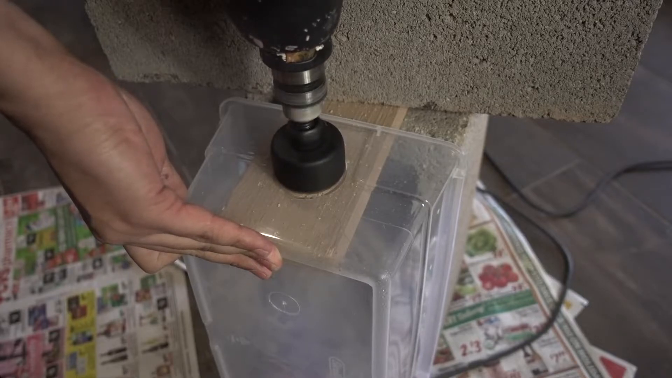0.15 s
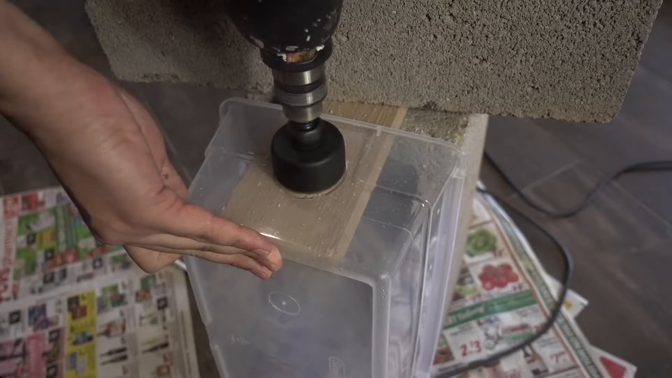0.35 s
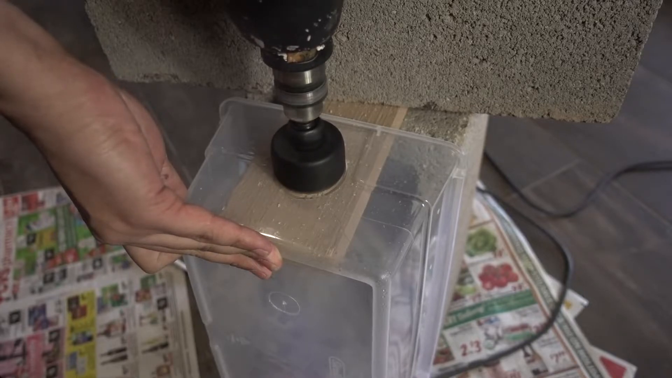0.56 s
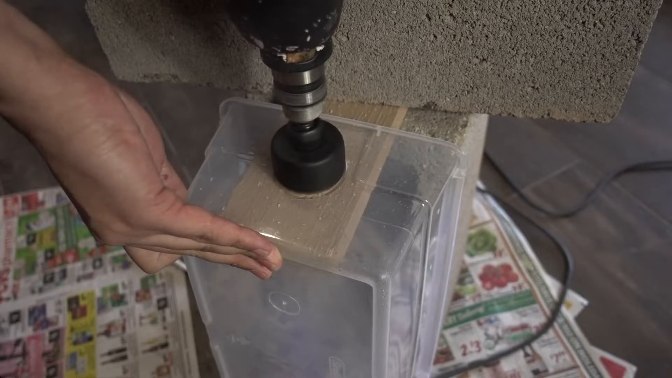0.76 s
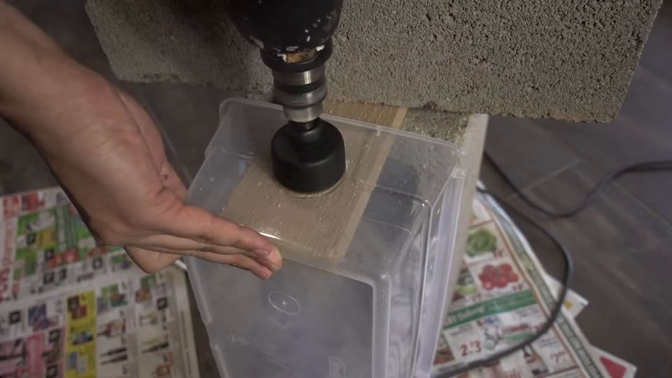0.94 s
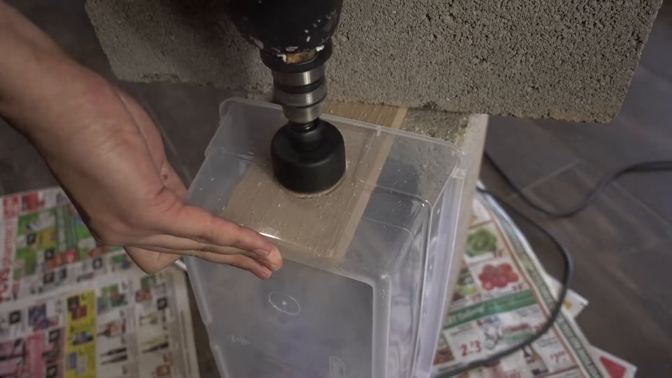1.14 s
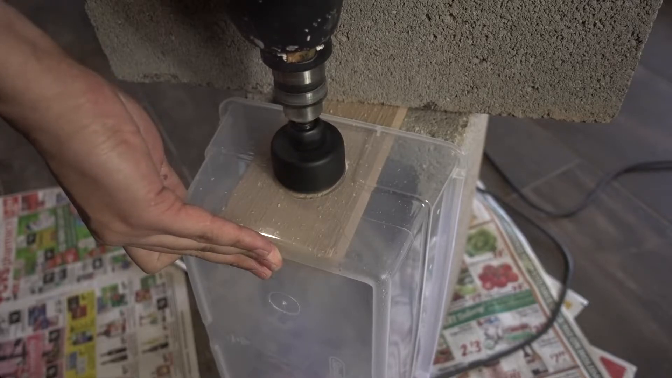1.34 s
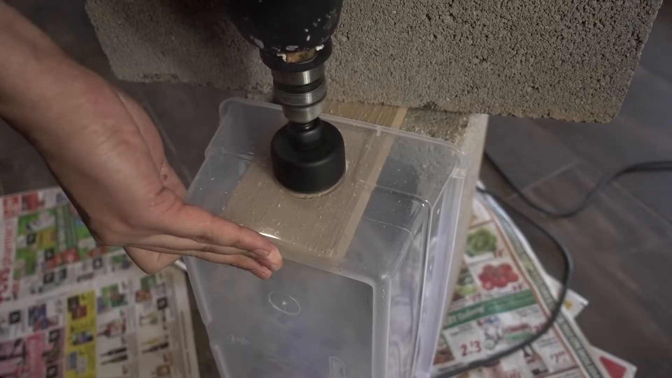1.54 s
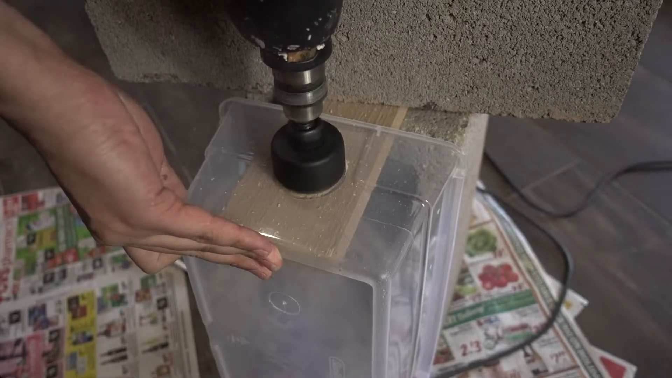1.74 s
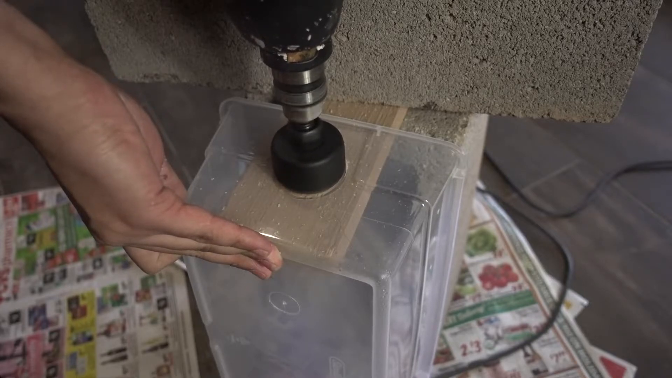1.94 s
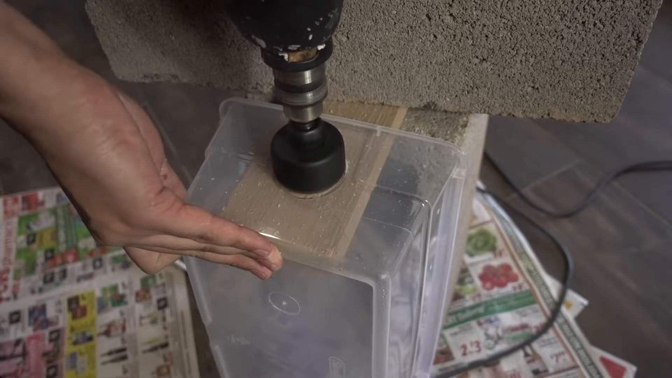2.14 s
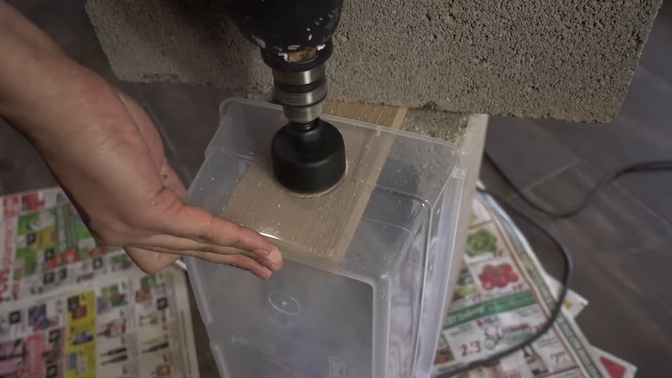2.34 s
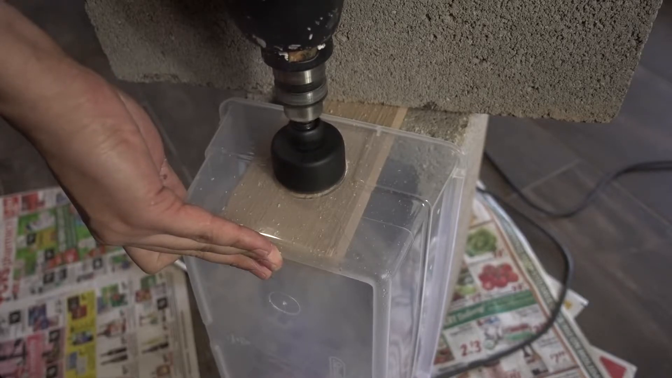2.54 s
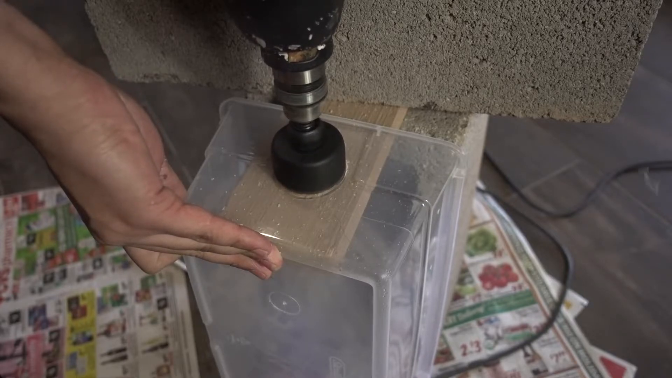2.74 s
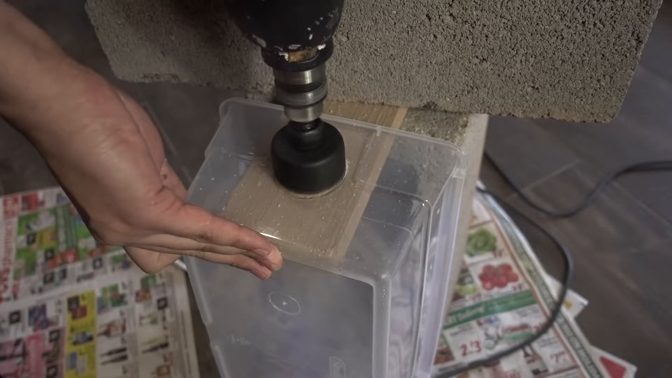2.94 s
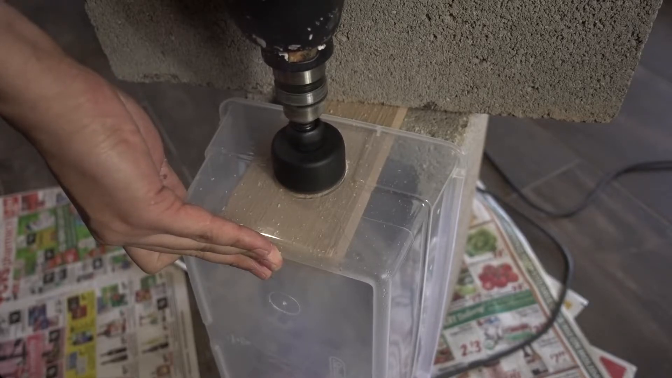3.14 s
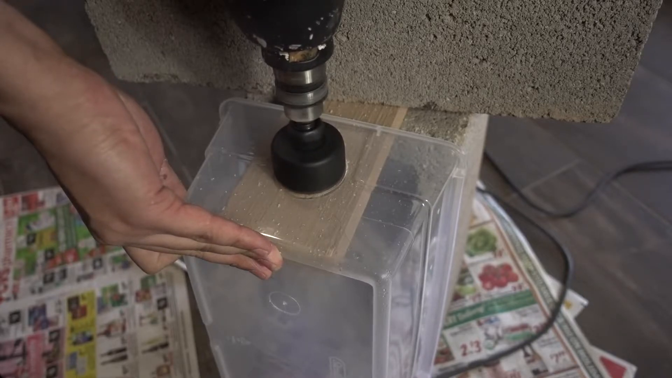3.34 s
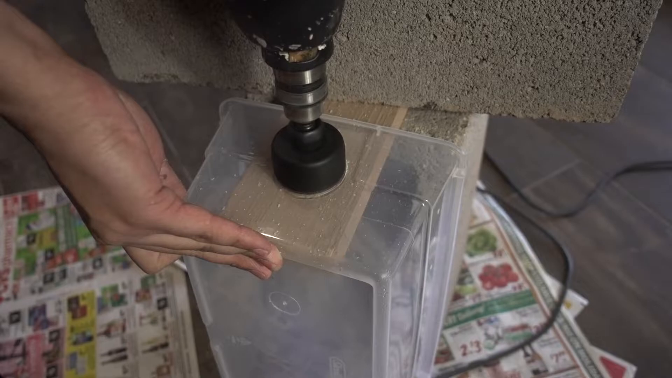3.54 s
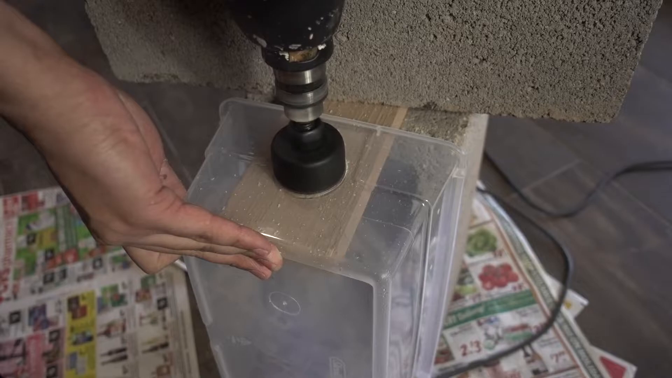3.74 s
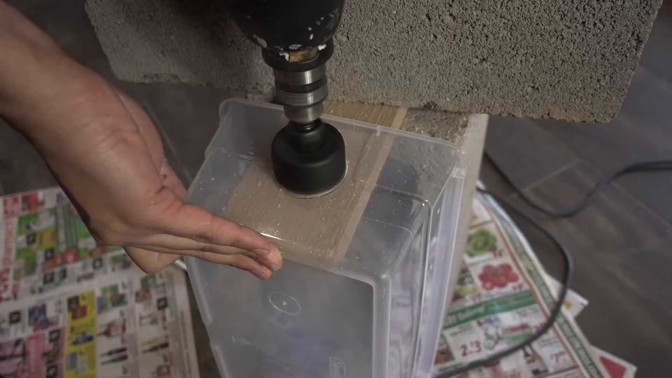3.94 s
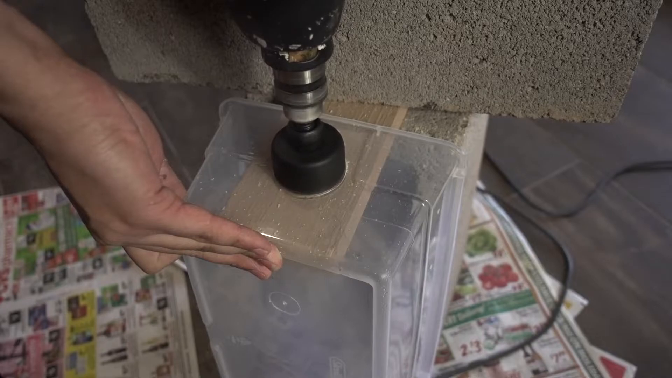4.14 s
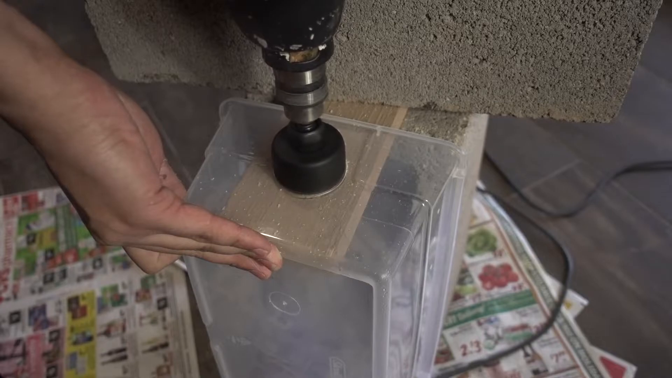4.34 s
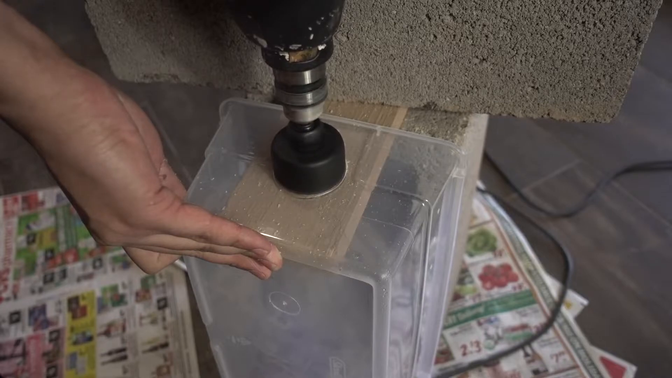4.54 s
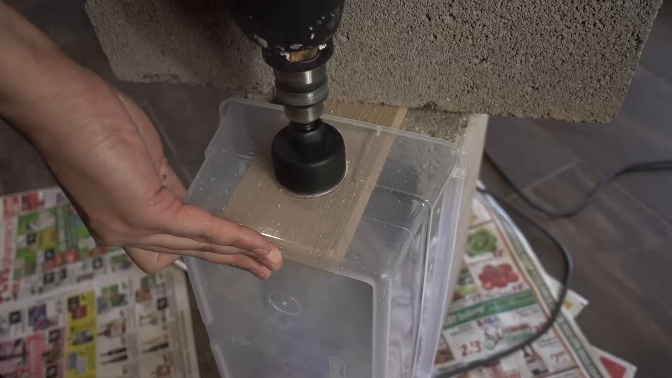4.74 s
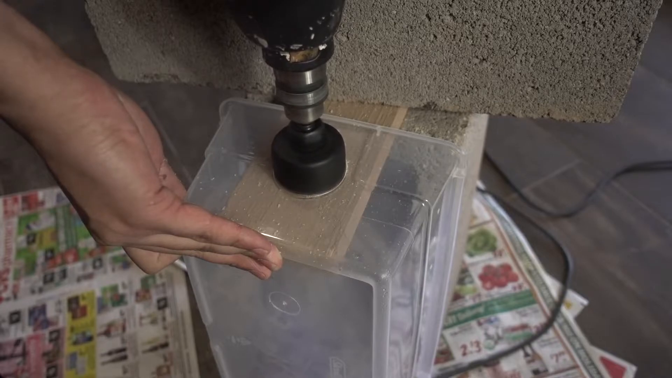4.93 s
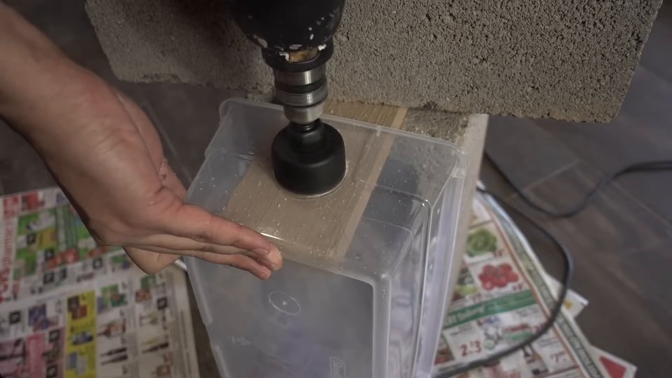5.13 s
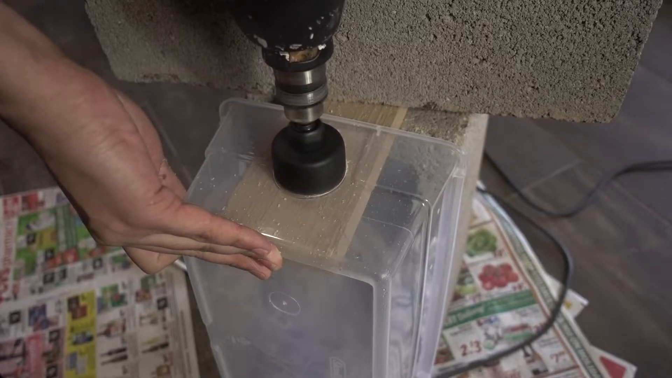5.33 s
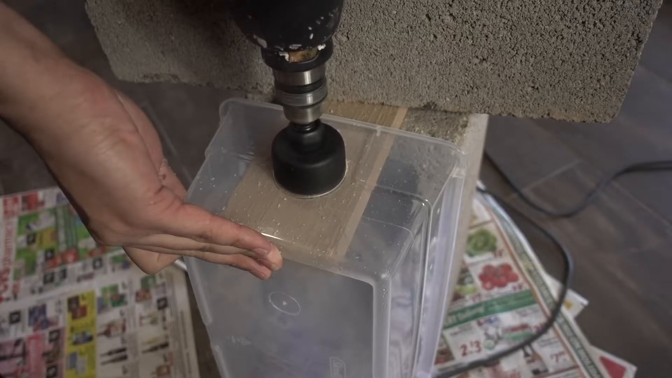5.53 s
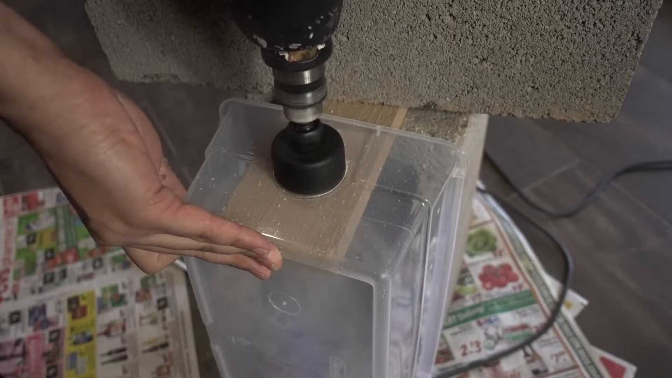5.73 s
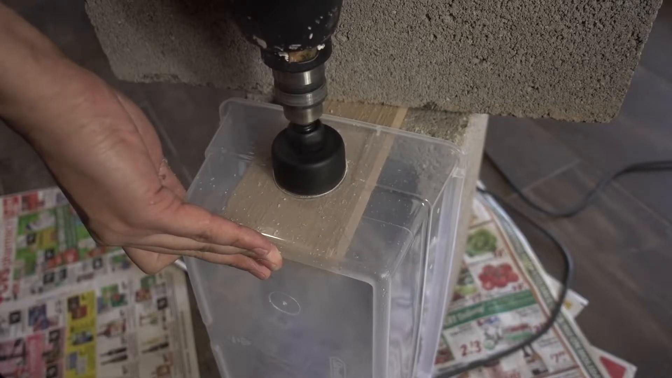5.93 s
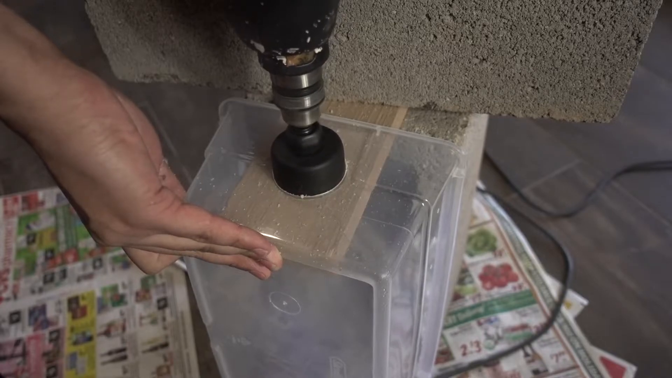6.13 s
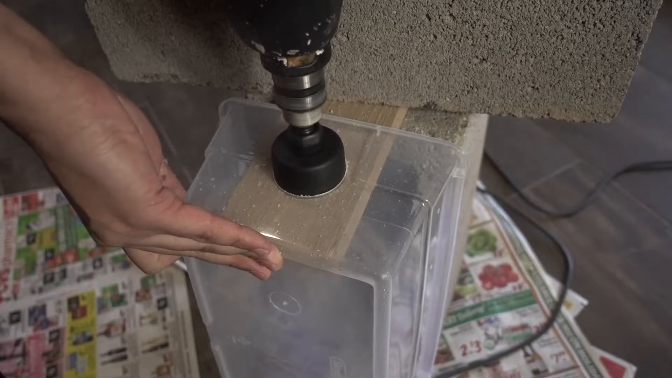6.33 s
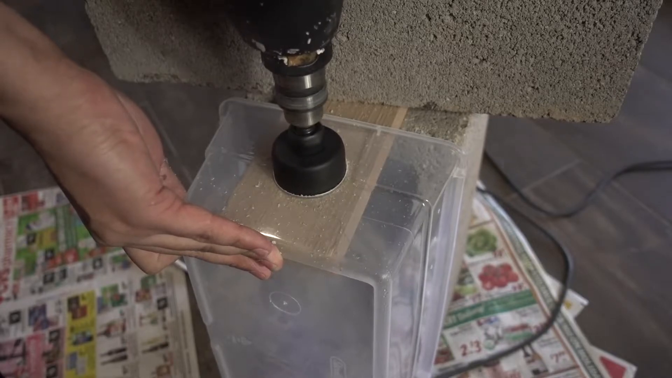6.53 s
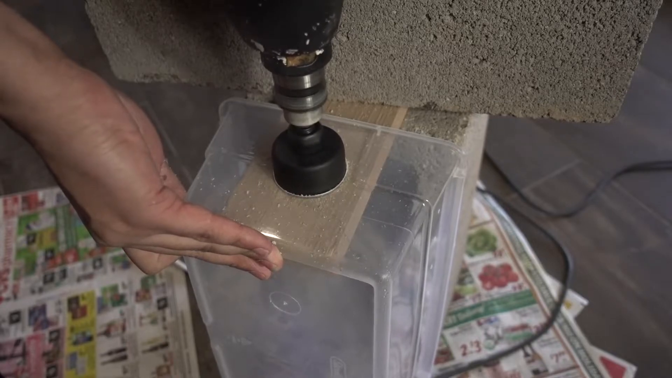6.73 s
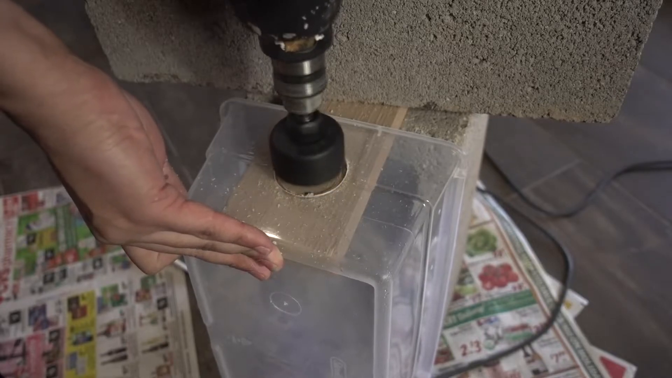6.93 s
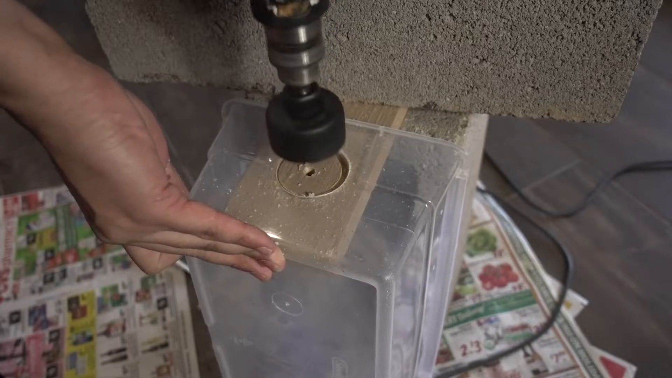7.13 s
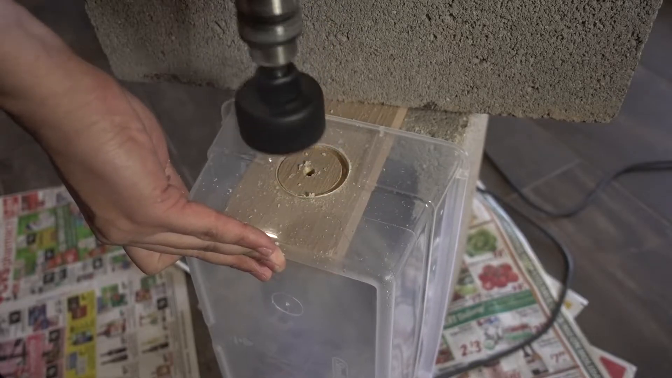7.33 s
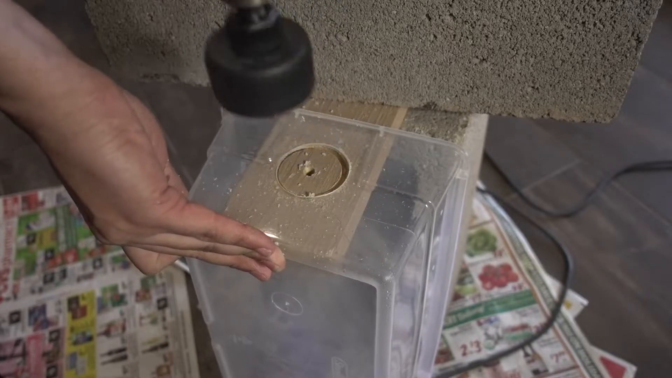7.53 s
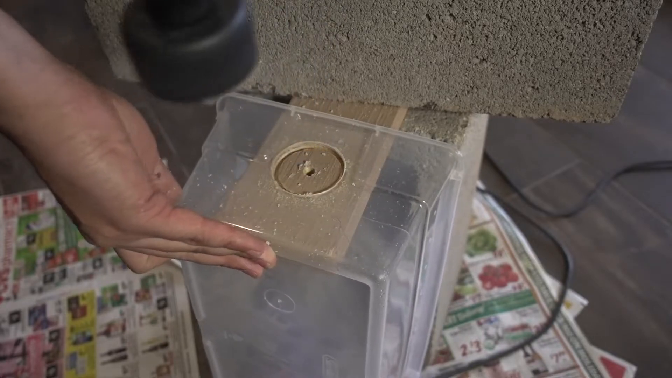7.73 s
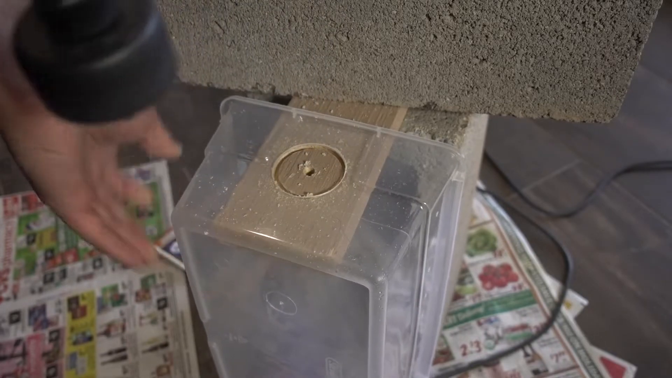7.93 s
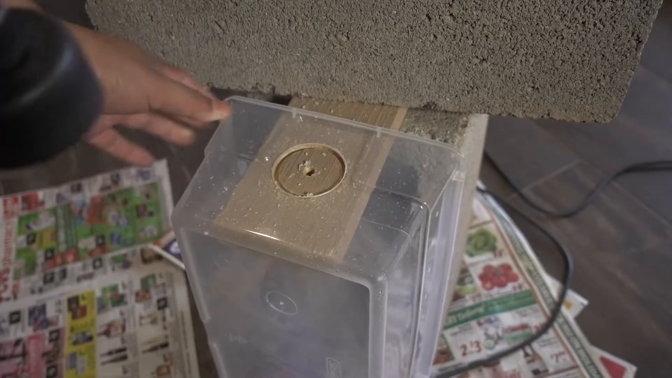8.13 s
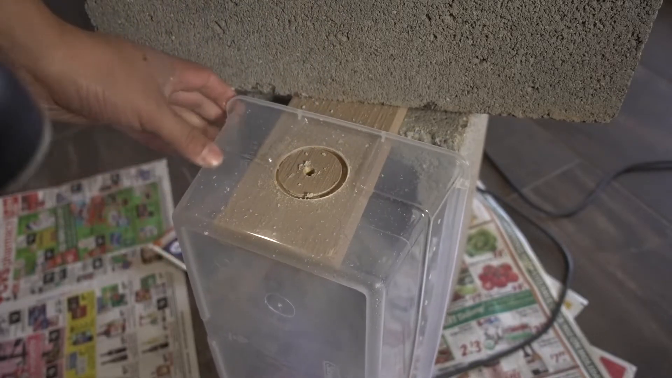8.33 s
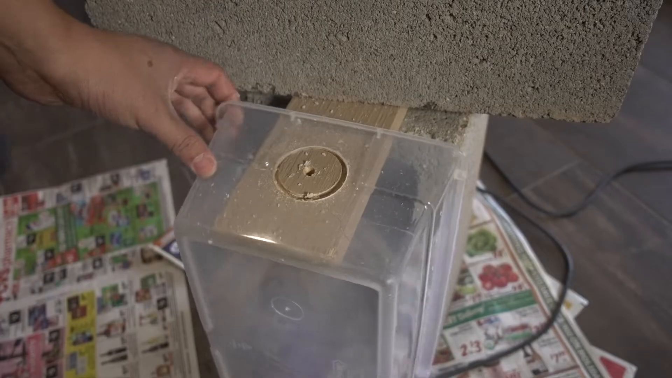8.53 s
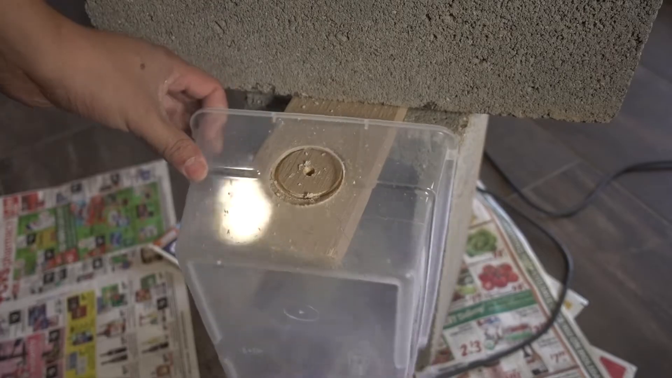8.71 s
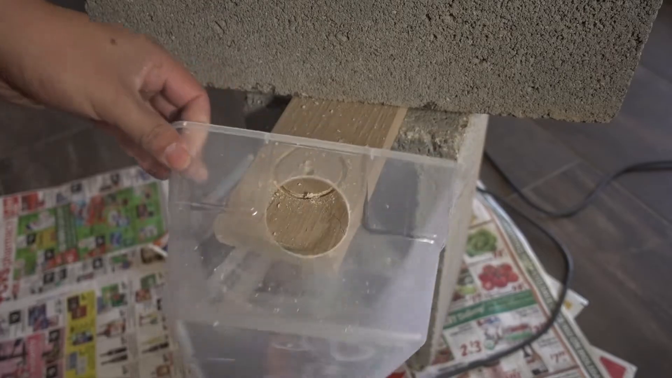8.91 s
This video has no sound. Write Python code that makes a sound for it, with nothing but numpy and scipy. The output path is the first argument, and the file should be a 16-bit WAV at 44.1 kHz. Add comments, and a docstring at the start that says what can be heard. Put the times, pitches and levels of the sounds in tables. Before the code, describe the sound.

A corded drill grinds a hole saw through a plastic box with a harsh whine, then winds down with rattling gears.

```python
"""A harsh, grinding whine: a corded drill turns a hole saw through a plastic box in a small room.
One shaft drives the hum, gear mesh, commutator buzz and brush hiss, so their pitch sags under load
and rises as the saw breaks through. The drill is lifted out to the left and its cooling air sweeps
over the microphone. With the power off it coasts down in falling whistles and rattling gears,
and a hand bumps the box."""
import sys
import numpy as np
from scipy import signal
from scipy.fft import rfft, irfft, next_fast_len
from scipy.io import wavfile
from scipy.ndimage import map_coordinates

SR = 44100
rng = np.random.default_rng(int(sys.argv[2]) if len(sys.argv) > 2 else 0)


def persist_wave(psi):
    """Save psi, clipped to +-1, as 16-bit WAV."""
    counts = np.round(np.clip(psi, -1, 1) * 32767).astype(np.int16)
    wavfile.write(sys.argv[1], SR, np.atleast_2d(counts).T)


N = 399974
TIME = np.arange(N) / SR

PIERCE_S, THROUGH_S, CLEAR_S = 4.5, 6.1, 6.95  # first teeth pierce, the disc gives way, the saw is clear
RELEASE_S, SWING_START_S, SWING_END_S = 7.3, 7.58, 8.05  # trigger let go; the drill swings left
FREE_SPEED, LOADED_SPEED = 402, 352  # shaft with no load and full load [turns/s]
MAINS_HZ, TOP_HZ = 60, 15850

# Motor shaft under power: (time [s], speed [turns/s])
SHAFT_SPEED = [(0, 382), (.6, 374), (1.2, 366.5), (1.7, 363.5), (2.3, 357.5), (2.7, 358.5), (3.1, 362),
               (4, 357), (5, 350), (5.4, 354), (5.8, 348), (6.1, 340), (6.19, 328), (6.3, 338), (6.5, 354),
               (6.9, 390), (7.12, 400), (7.3, 378)]
def motor():
    """Torque balance: speed sags with load (0-1); unpowered, friction and quadratic fan drag brake it."""
    friction, drag_speed = 94.3, 248  # deceleration [turns/s^2]; speed where drag equals it [turns/s]
    driven, = curves(SHAFT_SPEED)
    coast_s = np.maximum(TIME - RELEASE_S, 0)
    coasting = drag_speed * np.tan(np.arctan(driven[-1] / drag_speed) - coast_s * friction / drag_speed)
    sag = np.clip((FREE_SPEED - driven) / (FREE_SPEED - LOADED_SPEED), 0, 1)
    load = sag ** 0.91 * (1 - ramp(THROUGH_S, CLEAR_S))
    return np.where(TIME < RELEASE_S, driven, coasting), load


# Noise spectra of gear rattle, gear rasp and brushes: (frequency [Hz], spectral level [dB])
RATTLE_SPECTRUM = [(150, -56), (530, -36), (900, -5), (1100, -3), (1190, -1.5), (1290, -3), (1450, -0.5),
                   (2040, 0), (2240, -2.5), (3100, -4), (4030, -26), (6820, -120)]
RASP_SPECTRUM = [(400, -70), (1650, -38), (2800, -7), (3070, -8.5), (3480, -1), (3820, -4), (4290, 1.5),
                 (4640, -3), (5400, -11.5), (7020, -21), (11900, -120)]
BRUSH_SPECTRUM = [(2940, -35), (5000, -2), (5760, -3.5), (6250, -0.5), (6860, -2.5), (7560, 1), (8290, -5),
                  (9600, -4.5), (12000, -8.5), (12900, -8.5), (13800, -11.5), (15000, -8.5), (16000, -15)]
def gears_and_brushes(turns, speed, load, powered, mains):
    """Amplitude modulation: friction noise pulses with each turn, while tooth impacts ring the case."""
    shaft = np.cos(2 * np.pi * turns)
    bite = wobble(70)  # the teeth catch unevenly
    rattle_db = by_speed(speed, -23, knee=353, halving_db=8.2) - 0.07 * load
    rattle = amp(rattle_db) * spread(white() * amp(2.5 * shaft + 0.58 * bite), RATTLE_SPECTRUM)
    overrun_db = 1 - powered  # more rasp once the saw drives the motor
    rasp_db = by_speed(speed, -21, knee=192, halving_db=17.4) + overrun_db
    rasp = amp(rasp_db) * spread(white() * amp(2 * shaft + 0.64 * bite + 0.31 * mains), RASP_SPECTRUM)
    sparks = white() * amp(.9 * shaft + 0.66 * bite + 0.23 * mains + 0.84 * wobble(300))
    brushes = amp(by_speed(speed, -21.5, knee=348, halving_db=9.2)) * spread(sparks, BRUSH_SPECTRUM)
    teeth = unit(filtered(impacts(6 * turns + .2 * wobble(500), scatter_db=3), gear_case))
    return rattle + rasp + brushes + amp(rattle_db - 4.5) * in_room(teeth, wet_db=-9.5)


# Shaft hum: (multiple of shaft speed, relative level loaded [dB], relative level free [dB])
HUM_PARTIALS = [(1, 2, -3), (2, 4.5, 2.5), (3, 9, 13.5), (4, 12.5, 10)]
# Six-tooth mesh with sidebands, and commutator: (multiple of shaft speed, relative level [dB])
MESH_PARTIALS = [(4, -10), (5, -1.5), (6, 1), (7, -.3), (8, -5.5), (9, -12.5), (10, -23), (11, -14)]
BUZZ_PARTIALS = [(12, 0.5), (18, -6), (22, -11), (24, -9.5), (36, -18)]
def whine(turns, speed, load, mains):
    """Periodic forcing: shaft, gear mesh and commutator radiate harmonics of the rotation rate."""
    free = ramp(THROUGH_S, CLEAR_S)
    idle = (1 - load) * (speed / FREE_SPEED) ** 2
    hum_levels = [(k, loaded_db + free * (free_db - loaded_db)) for k, loaded_db, free_db in HUM_PARTIALS]
    hum_fade = 1 - ramp(RELEASE_S, RELEASE_S + 0.65)
    hum_gain = hum_fade * amp(by_speed(speed, -48.5, knee=380, halving_db=26))
    hum = hum_gain * partials(turns, hum_levels, flutter_db=2.1, flutter_rate=25)

    case_hz, half_width_hz = 1940, 110  # mesh partials swell as they cross this resonance
    mesh_levels = [(k, db + 5.5 / (1 + ((k * speed - case_hz) / half_width_hz) ** 2))
                   for k, db in MESH_PARTIALS]
    mesh_gain = load * (1 - free) ** 2 * amp(-30) + idle * amp(-52)
    mesh = mesh_gain * partials(turns + 0.0058 * wobble(90), mesh_levels, flutter_db=2, flutter_rate=45)

    shudder = 0.0084 * wobble(130) + 0.003 * mains  # torque ripple twists the armature
    saw_turns = turns / 17.3  # gear reduction
    throb = amp(1.2 * mains + 0.71 * np.cos(2 * np.pi * saw_turns))
    breakout_db = 5 * np.sin(np.pi * free)
    buzz_gain = throb * (load * amp(-29.5) + idle * amp(-34.5 + breakout_db))
    buzz = buzz_gain * partials(turns + shudder, BUZZ_PARTIALS, flutter_db=2.5, flutter_rate=70)
    strain_db = 1.5 * load * np.clip((LOADED_SPEED - speed) / 10, 0, 1)  # the motor bogs down
    return in_room(hum + amp(strain_db) * (mesh + buzz), wet_db=-11)


# Churning saw and droning box bottom: (frequency [Hz], spectral level [dB])
CHURN_SPECTRUM = [(15, -66), (25, -48), (118, -48), (173, -36), (273, -21), (310, -17.5), (357, -12),
                  (393, -13), (425, -16), (498, -4), (603, -3), (684, 2), (814, -2.5), (1100, -8.5),
                  (1430, -36), (2420, -120)]
DRONE_SPECTRUM = [(40, -27), (110, -17), (170, -9), (275, 6), (330, -2), (600, -20)]
def hole_saw(turns, speed):
    """Forced vibration: teeth scrape the surface, settle in a groove, then set the pierced box droning."""
    scraping = 1 - ramp(0.7, 2.9)
    pierced = ramp(PIERCE_S - .2, PIERCE_S)
    in_groove = (1 - scraping) * (1 - pierced)
    churn_db = by_speed(speed, -35.5, knee=200, halving_db=16.4) + 3.5 * scraping - 2.5 * in_groove
    pulsing = amp(1.4 * np.cos(2 * np.pi * turns))
    churn = amp(churn_db + 0.56 * wobble(12)) * spread(white() * pulsing, CHURN_SPECTRUM)
    droning = pierced * (1 - ramp(CLEAR_S - .05, CLEAR_S))
    drone_db = -58.5 + 2.5 * (TIME - PIERCE_S) + 2.3 * wobble(25)
    return churn + droning * amp(drone_db) * spread(white(), DRONE_SPECTRUM)


# Envelope of the commutator's treble: (time [s], relative level [dB])
WHISTLE_LEVEL = [(0, -37), (6.2, -51), (7.1, -34.5), (7.85, -41), (8.2, -42.5), (8.93, -41), (9.07, -46)]
# Treble resonance and the fizz around it: (frequency [Hz], gain [dB])
TREBLE_RESONANCE = [(9000, -22), (12000, -9), (13500, 0), (14500, 2), (16000, 1)]
FIZZ_SPECTRUM = [(6000, -28), (10000, -2), (12000, -3), (13500, 0), (16000, -11)]
def commutator_whistles(turns, speed, powered, bars=12):
    """Resonance: bar-rate harmonics slide through a treble peak, blurred by sparking under power."""
    level_db, = curves(WHISTLE_LEVEL)
    bar_phase = bars * (turns + (0.0008 + .0018 * powered) * wobble(400))
    tones = np.zeros(N)
    for k in range(3, 10):
        hz = k * bars * speed
        tones += amp(along(TREBLE_RESONANCE, hz)) * (hz < TOP_HZ) * np.sin(2 * np.pi * k * bar_phase)
    fizz = amp(6.5) * spread(white() * amp(2.8 * wobble(110)), FIZZ_SPECTRUM)
    return amp(level_db) * (in_room(tones, wet_db=-6) + fizz)


# Modes of the gear case: (frequency [Hz], bandwidth [Hz], gain [dB])
CASE_MODES = [(1471, 134, 1), (1936, 224, 1), (2600, 290, 1.5), (3080, 250, -1.5), (3660, 220, -1),
              (4310, 420, -8.5)]
def gear_case(hz):
    """Modal superposition: the case responds as a sum of damped resonators of alternating sign."""
    return sum((-1) ** k * amp(db) * 1j * hz * width / (centre ** 2 - hz ** 2 + 1j * hz * width)
               for k, (centre, width, db) in enumerate(CASE_MODES))


def gear_chatter(turns):
    """Impact excitation: unpowered, the loose gears tick in their case ever more slowly."""
    ticks = unit(filtered(impacts(1.5 * turns + .3 * wobble(150), scatter_db=6.5), gear_case))
    level_db = -30 - 4 * np.maximum(TIME - SWING_END_S, 0)
    return ramp(RELEASE_S, SWING_END_S) * amp(level_db) * in_room(ticks, wet_db=-11)


# Blows between gear teeth: (time [s], level [dB])
GEAR_KNOCKS = [(8.285, -11.5), (8.3384, -15), (8.573, -11.5), (8.6077, -12), (8.697, -14), (8.738, -14),
               (8.8024, -13.5), (8.8937, -16.5), (8.9377, -15.5), (8.9702, -13.5), (8.9938, -17),
               (9.0228, -22), (9.053, -21.5)]
def backlash():
    """Impulse response: the slowing gears knock across their play, and each blow rings the case."""
    blows = np.zeros(N)
    for s, db in GEAR_KNOCKS:
        blows[round(s * SR)] = amp(db)
    ring = filtered(blows, gear_case)
    return in_room(ring * blows.max() / np.abs(ring).max(), wet_db=-2)


# Cooling air on the microphone: (time [s], level [dB])
JET_LEVEL = [(7.33, -56), (7.37, -39), (7.48, -32), (7.55, -21), (7.72, -19), (7.9, -24.5), (7.97, -30),
             (8.042, -56)]
# Its turbulence: (frequency [Hz], spectral level [dB])
JET_SPECTRUM = [(15, -59), (25, -31), (86, -21), (140, -10.5), (224, -7.5), (275, -4), (482, -0.5),
                (815, -1.5), (1230, -1.5), (2200, -13), (2860, -45), (4840, -120)]
# Its likeness between left and right: (frequency [Hz], correlation [-1 to 1])
JET_CORRELATION = [(60, 1), (240, 0.66), (950, 0.13), (3770, 0.56), (15000, -0.07)]
def fan_jet():
    """Turbulence: pressure fluctuations in the cooling fan's jet buffet the microphone as it passes."""
    level_db, = curves(JET_LEVEL)
    start_s, end_s = JET_LEVEL[0][0], JET_LEVEL[-1][0]
    passing = ramp(start_s - .02, start_s) - ramp(end_s, end_s + .02)
    return passing * amp(level_db + 1.7 * wobble(110)) * spread(white(), JET_SPECTRUM, JET_CORRELATION)


# A hand takes hold of the box: (time [s], level [dB])
HAND_BUMPS = [(8.85, -41), (8.885, -54)]
# The box's dull response: (frequency [Hz], spectral level [dB])
BOX_SPECTRUM = [(30, -33), (130, -16), (280, 4), (600, 1), (1500, -30)]
def box_bumps(t60_s=0.23):
    """Damping: each soft bump on the plastic box dies away exponentially."""
    envelope = sum(amp(db - 60 * np.abs(TIME - s) / t60_s) * (TIME > s) for s, db in HAND_BUMPS)
    return envelope * spread(white(), BOX_SPECTRUM)


def swing_left(drill, lag_s=7.5e-5):
    """Level and time differences place the drill to the left; it dips and flutters as the jet passes."""
    moved = ramp(SWING_START_S, SWING_END_S)
    pan_db = 0.7 + 4.8 * moved  # left minus right
    dip_db = np.exp(-((TIME - 7.75) / 0.15) ** 2) * (4 + 4.7 * np.abs(wobble(60)))
    right = map_coordinates(drill[1], [np.arange(N) - moved * lag_s * SR], order=5)
    return np.array([drill[0], right]) * amp(np.array([pan_db, -pan_db]) / 2 - dip_db)


# Decay of the small room: (frequency [Hz], reverberation time [s])
ROOM_T60 = [(200, 0.086), (2000, 0.79), (12000, 0.13)]
def in_room(x, wet_db):
    """Reverberation: a short diffuse tail follows the direct sound at each ear."""
    hz, t, noise = signal.stft(rng.standard_normal((2, SR // 3)), SR, nperseg=256)
    tail = signal.istft(noise * amp(-60 * t / along(ROOM_T60, hz)[:, None]), SR, nperseg=256)[1]
    return x + amp(wet_db) * signal.fftconvolve(x[None], tail / np.linalg.norm(tail[0]), axes=1)[:, :N]


# Left-right likeness of drill and box noise: (frequency [Hz], correlation [-1 to 1])
NEAR_CORRELATION = [(60, 1), (250, 1), (500, 1), (1000, 0.96), (2000, 0.99), (4000, 0.75), (8000, 0.61),
                    (14000, 0.61)]
def spread(pair, spectrum, correlation=NEAR_CORRELATION):
    """Partial coherence: two independent noises mix, as mid and side, into coloured stereo of rms 1."""
    def response(hz):
        angle = np.arccos(np.clip(along(correlation, hz), -1, 1)) / 2
        return amp(along(spectrum, hz)) * [np.cos(angle), np.sin(angle)]
    mid, side = filtered(pair, response)
    return unit(np.array([mid + side, mid - side]))


def partials(turns, levels, flutter_db, flutter_rate):
    """Harmonic series: sines locked to the shaft, each fluttering in strength."""
    return np.sqrt(2) * sum(amp(db + flutter_db * wobble(flutter_rate))
                            * np.sin(2 * np.pi * (round(k) * turns + rng.random())) for k, db in levels)


def impacts(phase, scatter_db):
    """Impulse train: one pulse of random size and sign each time the phase passes a whole number."""
    at = np.flatnonzero(np.diff(np.floor(phase)) > 0)
    sizes = amp(scatter_db * np.clip(rng.standard_normal(len(at)), -2, 2))
    train = np.zeros(N)
    train[at] = sizes * rng.choice([-1, 1], len(at))
    return train


def by_speed(speed, full_db, knee, halving_db):
    """Power law: below the knee [turns/s] the level loses halving_db with each halving of speed."""
    return full_db + halving_db * np.minimum(np.log2(speed / knee), 0)


def filtered(x, response):
    """Linear filtering: the spectrum of x times a complex response of frequency."""
    size = next_fast_len(N + SR // 4)
    return irfft(rfft(x, size) * response(np.fft.rfftfreq(size, 1 / SR)), size)[..., :N]


def wobble(rate):
    """Slow random modulation: a spline through rate knots a second."""
    knots = rng.standard_normal(int(N * rate / SR) + 4)
    coarse = np.arange(0, N + 16, 16)
    return np.interp(np.arange(N), coarse, map_coordinates(knots, [coarse * rate / SR]))


def white():
    """Two independent white noises."""
    return rng.standard_normal((2, N))


def along(points, hz):
    """Interpolation of (frequency [Hz], value) points on a logarithmic axis."""
    freqs, values = np.transpose(points)
    return np.interp(np.log(hz + 1), np.log(freqs + 1), values)


def curves(rows):
    """Interpolation in time: one value per sample for each column after the first."""
    times, *columns = np.transpose(rows)
    return [np.interp(TIME, times, column) for column in columns]


def ramp(start_s, end_s):
    """Linear rise from 0 to 1 between two times."""
    return np.clip((TIME - start_s) / (end_s - start_s), 0, 1)


def amp(db):
    """Decibels to amplitude ratio."""
    return 10 ** (np.asarray(db) / 20)


def unit(x):
    """Normalisation to rms 1."""
    return x / np.sqrt(np.mean(x ** 2) + 1e-20)


def scene():
    """Superposition: the drill's parts, driven by one shaft, add to the air jet and the box bumps."""
    speed, load = motor()
    turns = np.cumsum(speed * (1 + .0013 * wobble(22))) / SR
    powered = 1 - ramp(RELEASE_S - .1, RELEASE_S)
    mains = powered * np.cos(2 * np.pi * MAINS_HZ * TIME)
    drill = whine(turns, speed, load, mains) + commutator_whistles(turns, speed, powered)
    drill += gears_and_brushes(turns, speed, load, powered, mains)
    drill += hole_saw(turns, speed) + gear_chatter(turns) + backlash()
    return swing_left(drill) + fan_jet() + box_bumps()


def record(dry):
    """Soft saturation rounds the highest peaks; a low-pass cut removes everything above TOP_HZ."""
    ceiling = .9
    rounded = dry / (1 + (dry / ceiling) ** 6) ** (1 / 6)
    return filtered(rounded, lambda hz: hz < TOP_HZ)


dry = scene()
out = record(dry)
persist_wave(out)
```